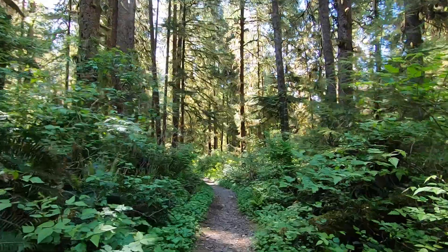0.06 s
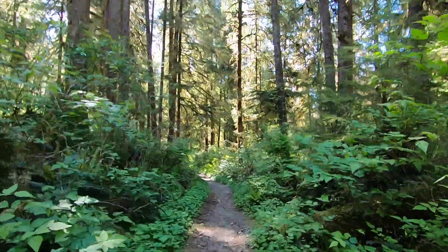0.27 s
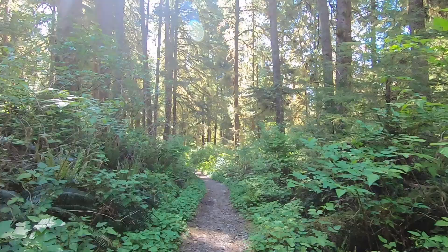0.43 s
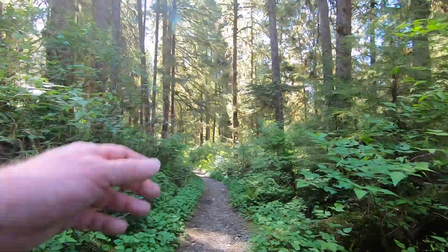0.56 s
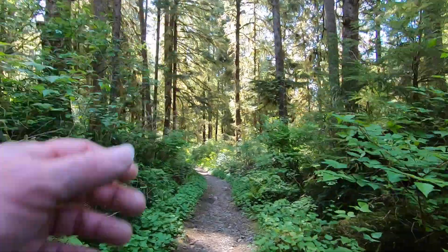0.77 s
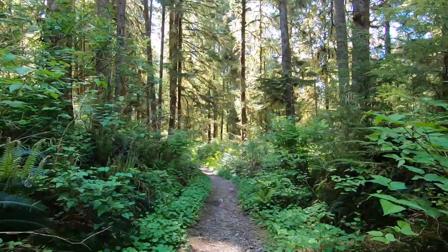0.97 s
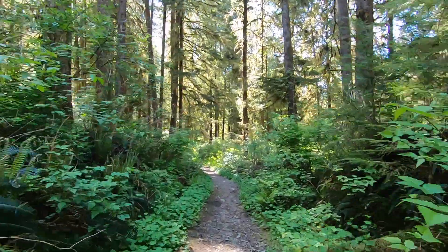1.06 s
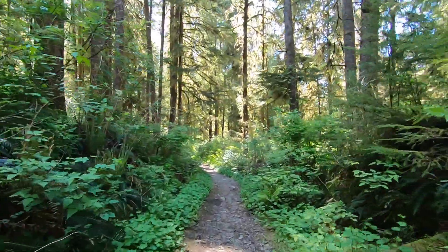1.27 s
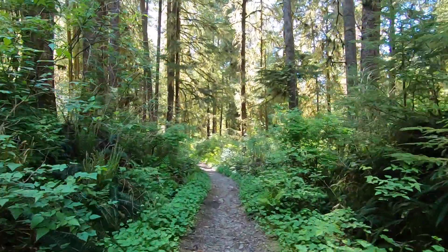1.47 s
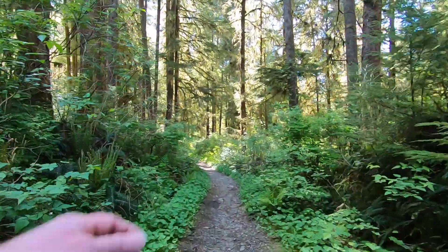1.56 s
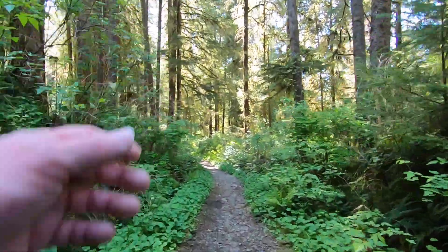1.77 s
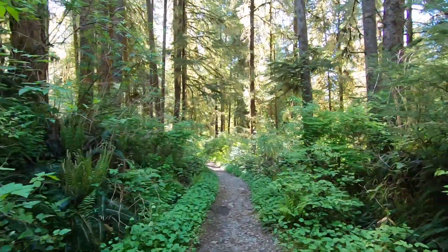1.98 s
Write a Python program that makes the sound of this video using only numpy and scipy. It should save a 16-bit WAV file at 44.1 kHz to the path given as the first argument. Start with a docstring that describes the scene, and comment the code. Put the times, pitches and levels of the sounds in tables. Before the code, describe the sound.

Footsteps on a dirt trail, close and dry, from a small camera carried by the walker. Faint cloth rustle and low shudder open, fairly wide. Steps land near 0.27, 0.77, 1.28 and 1.78 seconds, each a short gritty crunch with a dull thud and snapping stones or twigs. Tiny gear clinks and buzzes follow faintly. Quiet hush fills gaps; the sound narrows nearly to mono, then widens at the end.

```python
"""Four steps on a dirt trail in a quiet forest, heard by a small camera carried on the walker.
The stereo picture starts wide over cloth rustle and a low shudder, then narrows to nearly mono.
Each footfall in turn crunches grit as grains of noise, with damped swings for thuds and snapping stones
and twigs, and low noise for the shudder; a small hard part of the gear clinks and buzzes faintly.
The picture opens again at the end."""
import sys
import numpy as np
from scipy import signal
from scipy.io import wavfile
from scipy.ndimage import uniform_filter1d

SR = 44100
rng = np.random.default_rng(int(sys.argv[2]) if len(sys.argv) > 2 else 0)


def ratio(d):
    """dB to gain"""
    e = np.asarray(d, float) / 20
    return 10 ** e


def bounce(signal):
    """Save signal as a 16-bit WAV file at the path given by the first command-line argument."""
    frames = np.transpose(np.atleast_2d(signal))
    limited = np.clip(frames, -1, 1)
    pcm = np.round(limited * 32767).astype(np.int16)
    wavfile.write(sys.argv[1], SR, pcm)


N = 88729  # samples, about 2 s

# Modes of the small hard part of the gear. Each row: pitch in Hz, level in dB, t60 in seconds.
CLINK_MODES = [(6440, -7.5, 0.011), (7700, -22, 0.0045), (9400, -9, 0.011), (10380, -18.5, .01),
               (13300, -31, 0.005)]


def evened(x):
    """Scales a sound to an rms of 1."""
    return x / np.sqrt(np.mean(x ** 2) + 1e-20)


def read(points, hz):
    """Reads a curve of (Hz, value) points along a logarithmic frequency axis."""
    f, value = np.transpose(points)
    return np.interp(np.log(hz + 1), np.log(f + 1), value)


def along(table, order, off_db=None):
    """Column of a time curve at every sample; off_db holds outside the curve, else its end values."""
    rows = np.array(table)
    return np.interp(np.arange(N) / SR, rows[:, 0], rows[:, order], off_db, off_db)


def add(mix, s, sound):
    """Adds a sound to the mix in place, starting at s seconds and cut off at the end."""
    part = mix[round(s * SR):][:len(sound)]
    part += sound[:len(part)]


def colour(x, tone):
    """Causal minimum-phase filter with the given spectrum; the result has an rms of 1."""
    hz = abs(np.fft.fftfreq(16384, 1 / SR))
    # 18 dB per octave fall from two octaves under the first point
    octaves_below = np.log2(np.maximum(tone[0][0] / (hz + 1), 4) / 4)
    gain_db = np.maximum(read(tone, hz) - 18 * octaves_below, -100)
    log_gain = np.log(ratio(gain_db))
    # the Hilbert transform of the log gain gives the minimum phase
    spectrum = np.exp(log_gain - 1j * signal.hilbert(log_gain).imag)
    taps = np.fft.ifft(spectrum).real[:8192]
    fade = np.hanning(16384)[8192:]
    return evened(signal.oaconvolve(x, taps * fade)[:N])


def grains(per_s, spread_db, bed=.4):
    """Random clicks of random sign, a few of them large, on a bed of noise."""
    size_db = spread_db * np.minimum(rng.exponential(1, N), 5)
    size = ratio(size_db) * rng.choice([-1., 1.], N)
    clicks = size * (rng.random(N) < per_s / SR)
    return evened(clicks) + bed * rng.standard_normal(N)


def ring(db, hz, t60, rise_cycles, wobble):
    """A short damped swing that starts downwards; wobble makes its pitch uneven."""
    t = np.arange(9000) / SR
    uneven = evened(uniform_filter1d(rng.standard_normal(9000), 7))
    rise = 1 - np.exp(-(t * hz / rise_cycles) ** 2)
    shape = rise * ratio(-60 * t / max(t60, .003))
    warped_time = np.cumsum(1 + wobble * uneven) / SR
    return -ratio(db) * shape / shape.max() * np.sin(2 * np.pi * hz * warped_time)


def crunch():
    """Grains of grit crushed under the sole, dull and bright, follow the pressure of each step."""
    # One table per step. Each row: time in seconds, level in dB, upper mids minus level in dB.
    steps = [
        [(0.235, -95, -13), (0.247, -42, -20), (0.253, -41, -7), (0.263, -31.5, -19), (0.281, -26, -15.5),
         (0.305, -43.5, -1.5), (0.323, -36.5, 0), (0.335, -44, -22), (0.357, -43.5, -18), (0.363, -34.5, -9.5),
         (0.382, -41.5, -10), (0.395, -53, -23), (0.439, -45.5, -9), (0.475, -48, -7.5), (0.5, -55, -10)],
        [(0.746, -60, -24), (0.75, -29.5, -13), (0.766, -32.5, -13), (0.771, -50, -7), (0.776, -22.5, -17),
         (0.792, -31.5, -16), (0.81, -47, -6), (0.82, -36, -12), (0.844, -54, -21), (0.856, -41, -18),
         (0.876, -33, -21), (0.896, -63, -3), (1.028, -48, -17), (1.04, -49, -3)],
        [(1.234, -58, -7), (1.241, -28.5, -8), (1.25, -29.5, -22), (1.256, -31, -21), (1.278, -35.5, -7),
         (1.294, -20.5, -23.5), (1.304, -48.5, 1), (1.332, -54, -5), (1.342, -35.5, -9), (1.352, -40.5, -16),
         (1.368, -37, -9.5), (1.384, -46.5, -15), (1.5, -52, -21)],
        [(1.748, -72, -11), (1.754, -72, -23), (1.764, -34.5, -16), (1.782, -18, -22.5), (1.796, -32, -24),
         (1.816, -52, 6.5), (1.824, -28, -14.5), (1.844, -27.5, -19), (1.854, -40.5, -36), (1.958, -54.5, -4),
         (2.0, -55, -30)],
    ]
    # Spectra of the dull and the bright grit. Each row: frequency in Hz, relative density in dB per Hz.
    dull_tone = [(71, -21), (120, 1), (201, -1.5), (476, -3), (668, -6.5), (777, -7), (1160, -11),
                 (1420, -9.5), (2400, -42), (3120, -86), (5280, -120)]
    bright_tone = [(1180, -7), (2000, 3.5), (2410, -2.5), (2920, -1), (4040, -6), (6000, -27.5),
                   (7800, -27.5), (13200, -120)]
    level = sum(ratio(along(step, order=1, off_db=-120)) for step in steps)
    upper = sum(ratio(along(step, order=1, off_db=-120) + along(step, order=2)) for step in steps)
    dull = colour(grains(per_s=1200, spread_db=2.2), dull_tone)
    bright = colour(grains(per_s=1100, spread_db=2.4), bright_tone)
    return level * dull + upper * bright


def snaps():
    """Single stones and twigs snapping: short damped swings of uneven pitch."""
    # The dull ones first, then the bright ticks.
    # Each row: start in seconds, envelope peak in dB, pitch in Hz, t60 in seconds (3 ms at least).
    snap_rows = [(0.246, -38, 770, 0.011), (0.264, -21, 644, 0.0071), (0.259, -37, 630, 0.0081),
                 (0.271, -19, 1090, 0.0068), (0.276, -21.5, 1114, 0.013), (0.294, -28.5, 1200, 0.014),
                 (0.318, -32.5, 2000, 0.007), (0.3197, -23, 1448, 0.029), (0.749, -25, 1300, 0.011),
                 (0.764, -19.5, 624, 0.009), (0.7741, -19, 1100, 0.0054), (0.766, -29, 1380, 0.0076),
                 (0.777, -25.5, 1470, 0.011), (0.7775, -23.5, 680, 0.03), (0.764, -27, 410, 0.032),
                 (0.78, -24.5, 1250, 0.011), (0.788, -28, 620, 0.015), (0.985, -40, 1270, 0.014),
                 (1.1811, -31.5, 1770, 0.0047), (1.241, -19, 910, 0.0055), (1.2469, -20, 576, 0.015),
                 (1.269, -24, 680, 0.016), (1.274, -27, 930, 0.044), (1.289, -10.5, 1123, 0.0093),
                 (1.3155, -28, 1150, 0.0083), (1.3654, -25.5, 1500, 0.0089), (1.7105, -28.5, 1320, 0.0056),
                 (1.725, -38, 1350, 0.017), (1.754, -25.5, 650, 0.0056), (1.773, -27, 710, 0.0081),
                 (1.782, -16, 1293, 0.029), (1.7805, -24.5, 544, 0.036), (1.8231, -24, 1214, 0.01),
                 (1.839, -22.5, 1565, 0.019), (0.815, -35, 1880, 0.018), (0.883, -34, 1450, 0.012),
                 (1.308, -31, 1290, 0.011), (1.797, -23.5, 1390, 0.0078), (1.827, -28.5, 1700, 0.015),
                 (1.753, -38, 1500, 0.0087), (0.2754, -39, 3180, 0.033), (0.3077, -45, 3400, 0.012),
                 (0.3133, -40, 4370, 0.011), (0.3212, -38, 2950, 0.0089), (0.7103, -37, 2640, 0.004),
                 (0.712, -42.5, 3380, 0.018), (0.7493, -50, 2730, 0.01), (0.7534, -38, 3680, 0.018),
                 (0.766, -40, 2800, 0.01), (0.777, -33.5, 2570, 0.015), (0.7876, -46, 3200, 0.0082),
                 (0.872, -39.5, 2300, 0.016), (1.2416, -26, 3100, 0.0058), (1.2479, -31.5, 3470, 0.008),
                 (1.26, -37, 2260, 0.0067), (1.27, -36, 2880, 0.0086), (1.716, -37.5, 2220, 0.0023),
                 (1.877, -33, 1480, 0.015), (1.7665, -30, 4020, 0.01), (1.767, -40, 2480, 0.0054),
                 (1.774, -32, 3400, 0.012), (1.779, -32.5, 2820, 0.013), (1.782, -36, 2970, 0.011),
                 (1.816, -38, 3830, 0.012), (1.8256, -39, 3880, 0.01), (1.838, -29.5, 2780, 0.0096)]
    out = np.zeros(N)
    for s, db, hz, t60 in snap_rows:
        add(out, s, ring(db, hz, t60, rise_cycles=1.1, wobble=.13))
    return out


def thuds():
    """Thuds of heel and sole reaching the camera: damped swings of steady pitch."""
    # Each row: start in seconds, envelope peak in dB, pitch in Hz, t60 in seconds.
    thud_rows = [(0.279, -8, 200, 0.011), (0.324, -21, 185, 0.0091), (0.453, -37.5, 163, 0.054),
                 (0.754, -28, 162, 0.15), (0.803, -33, 81.4, 0.079), (.819, -26, 150, 0.0097),
                 (0.831, -33.5, 26.4, 0.22), (0.916, -29, 30, 0.066), (1.244, -31, 252, 0.023),
                 (1.292, -8.5, 185, 0.016), (1.299, -23, 62.3, 0.044), (1.2931, -17.5, 337, 0.025),
                 (1.307, -33, 200, 0.018), (1.343, -24, 213, 0.014), (1.756, -23.5, 164, 0.0094),
                 (1.777, -20, 296, 0.037), (1.786, -28.5, 108, 0.22), (1.827, -12.5, 98.6, 0.025),
                 (1.828, -24.5, 61, 0.11)]
    out = np.zeros(N)
    for s, db, hz, t60 in thud_rows:
        add(out, s, ring(db, hz, t60, rise_cycles=.55, wobble=0))
    return out


def shudder():
    """Low shudder of the camera on the body: noise in two bands; each footfall starts a new swell."""
    # One table per swell, the first from the very start.
    # Each row: time in seconds, level in dB, deepest part minus level in dB.
    swells = [
        [(0.0, -42, -1), (0.042, -66, -18), (0.062, -88, 8), (0.084, -66, -8), (0.118, -61, -12),
         (0.14, -69, -13), (0.168, -87, 17), (0.198, -73, -7), (0.215, -70, -11)],
        [(0.245, -42, -9), (0.277, -53, -13), (0.351, -37, -1), (0.395, -37.5, -2), (0.479, -61.5, 16),
         (0.495, -79, -9), (0.525, -89, 14), (0.669, -94, 0), (0.715, -72, -4)],
        [(0.747, -42, -25), (0.819, -36.5, -22), (0.853, -56, 9), (0.949, -48, -3), (0.999, -70, -2.5),
         (1.031, -74, -3), (1.083, -86, 13), (1.109, -69, 0), (1.205, -70, -9)],
        [(1.237, -36, -23), (1.305, -41, -18), (1.317, -47, -8), (1.333, -46, 8), (1.451, -70, 7),
         (1.489, -55, 4), (1.519, -64, 8), (1.609, -83, -11), (1.72, -72, -15)],
        [(1.752, -45, -19), (1.794, -37, -29), (1.838, -31, -24), (1.92, -63, 17), (1.968, -46, -8),
         (2.01, -95, 11)],
    ]
    # Spectra of the low and the deepest band. Each row: frequency in Hz, relative density in dB per Hz.
    low_tone = [(30, 4), (50, 12), (75, 13), (105, 8.5), (150, -69.5)]
    deep_tone = [(8, -17), (20, 35.5), (40, 5), (60, -40.5)]
    starts = [rows[0][0] for rows in swells[1:]]
    step = np.searchsorted(starts, np.arange(N) / SR)
    low_db = np.choose(step, [along(rows, order=1) for rows in swells])
    deep_db = np.choose(step, [along(rows, order=2) for rows in swells])
    low_level = uniform_filter1d(ratio(low_db), size=200)
    # this average looks back only, so the deepest part lags
    deep_level = uniform_filter1d(ratio(low_db + deep_db), size=600, origin=299)
    low = low_level * colour(rng.standard_normal(N), low_tone)
    deep = deep_level * colour(rng.standard_normal(N), deep_tone)
    return low + deep


def patchy():
    """Level that wavers within some 20 ms, as cloth folds rub and let go."""
    drift = uniform_filter1d(uniform_filter1d(rng.standard_normal(N), size=600), size=600)
    return ratio(1.5 * evened(drift))  # 1.5 dB rms


def rustle():
    """Clothing rustle over still air: a smooth low hush, with grainy, wavering mids and treble."""
    # Each row: time in seconds, then levels in dB of low hush, lower mids, upper mids and treble,
    # the last three ahead of the wavering.
    levels = [(0.0, -55.5, -55.5, -65, -66), (0.05, -59, -61.5, -67, -69.5),
              (0.11, -56.5, -58.5, -59, -62.5), (0.19, -52.5, -55, -62, -61), (0.23, -54, -58, -60, -72),
              (0.28, -52, -49, -90, -61), (0.33, -42, -44.5, -52, -56.5), (0.38, -52, -52, -58, -66),
              (0.4, -49, -51, -52.5, -54), (0.44, -54, -58, -64, -63.5), (0.69, -50, -56, -62.5, -66),
              (0.78, -47, -50.5, -57, -61), (0.79, -65, -46, -43, -48), (0.8, -39, -44, -57, -61),
              (0.88, -44.5, -46, -54, -67.5), (1.07, -50, -56, -62.5, -69.5),
              (1.26, -48.5, -47.5, -53, -56), (1.35, -43.5, -45, -57, -62.5),
              (1.41, -52, -50.5, -58.5, -69.5), (1.56, -50, -57.5, -59.5, -72),
              (1.67, -49.5, -55, -63, -67), (1.76, -47.5, -51.5, -57, -70.5), (1.78, -33, -39, -49, -52.5),
              (1.8, -48, -33.5, -53, -63), (1.84, -39, -60, -48, -55.5), (1.86, -52, -43.5, -57.5, -64),
              (1.92, -47, -52, -59.5, -70.5), (2.01, -55, -54, -59, -67)]
    # Spectra of the four bands. Each row: frequency in Hz, relative density in dB per Hz.
    hush_tone = [(65, -22.5), (113, -20), (135, -10), (156, 0), (210, 1), (249, -5.5), (330, -5),
                 (479, -10), (650, -16), (840, -114), (1430, -120)]
    mid_tone = [(320, -29), (550, 2.5), (1360, 1), (1650, 0.5), (1810, 1.5), (2300, -9.5), (2990, -26),
                (5060, -120)]
    upper_tone = [(1240, -28), (2100, 2), (2310, 2), (3450, -3.5), (3840, -5), (4950, -13), (5600, -57),
                  (7280, -47), (12300, -120)]
    treble_tone = [(3060, -2.5), (5200, 0), (5390, -2.5), (6090, -10.5), (6670, -3.5), (8660, -7.5),
                   (9610, -8), (10300, -9.5), (11000, -17), (11600, -25), (13700, -24), (15300, -34)]
    hush = ratio(along(levels, order=1)) * colour(rng.standard_normal(N), hush_tone)
    mids = ratio(along(levels, order=2)) * colour(grains(800, 3.6, bed=1.0), mid_tone)
    upper = ratio(along(levels, order=3)) * colour(grains(1000, 2.7, bed=1.6), upper_tone)
    treble = ratio(along(levels, order=4)) * colour(grains(700, 2.5, bed=1.86), treble_tone)
    return hush + patchy() * mids + patchy() * upper + patchy() * treble


def clinks():
    """A small hard part of the gear clinking: each clink rings all its modes, unevenly loud."""
    # Each row: start in seconds, level in dB ahead of the mode's own level and a random spread.
    clink_rows = [(0.2767, -45), (0.2927, -45.5), (0.32, -43), (0.337, -47), (0.372, -54), (0.395, -52),
                  (0.399, -44.5), (0.408, -53), (0.6406, -53.5), (0.7527, -53), (0.7867, -41),
                  (0.8034, -55), (1.1867, -52), (1.2496, -39.5), (1.294, -46), (1.777, -49), (1.838, -46)]
    spread_db = 5
    out = np.zeros(N)
    for s, db in clink_rows:
        for hz, mode_db, t60 in CLINK_MODES:
            peak_db = db + mode_db + spread_db * rng.standard_normal()
            add(out, s, ring(peak_db, hz, t60, rise_cycles=3.4, wobble=0.088))
    return out


def buzz():
    """The same part buzzing faintly as the cloth moves: grainy noise through two of its resonances."""
    # Each row: time in seconds, level in dB ahead of the level of each band.
    levels = [(0.0, -77), (0.25, -82), (0.33, -62), (0.385, -76), (0.396, -59), (0.42, -59.5), (0.435, -74),
              (0.56, -89), (0.81, -68), (1.05, -80.5), (1.28, -63.5), (1.4, -78.5), (1.73, -81),
              (1.84, -69), (1.89, -87), (2.01, -93)]
    # Level of each of the two bands in dB, lower band first.
    band_levels = [-3, -5]
    width_hz = 380
    r = np.exp(-np.pi * width_hz / SR)  # pole radius
    bands = np.zeros(N)
    for db, mode in zip(band_levels, CLINK_MODES[0:3:2]):  # first and third mode
        poles = [1, -2 * r * np.cos(2 * np.pi * mode[0] / SR), r * r]
        bands += ratio(db) * evened(signal.lfilter([1], poles, grains(600, 3.1, bed=0.58)))
    return ratio(along(levels, order=1)) * bands


def stereo(mid):
    """Everything reaches both microphone ports alike; a phase-scrambled share differs between them."""
    # Stereo width. Each row: time in seconds, width in dB below the split, width in dB above it.
    openness = [(0, 10.5, 0), (.33, -4, -9), (.45, -12, -16), (.7, -24, -20), (.75, -25, -26),
                (.8, -25, -10), (.86, -24, -21), (1.0, -31, -18), (1.2, -34, -29), (1.25, -28, -17),
                (1.3, -38, -41), (1.5, -26, -15), (1.68, -25, -22), (1.77, -11, -13), (2.01, -2, -7)]
    # Scrambled share at 0 dB width. Each row: frequency in Hz, side minus mid in dB ahead of a doubling.
    apart_curve = [(60, -11), (100, -11), (130, -18), (220, -16.5), (310, -30), (550, -18), (950, -11.5),
                   (1650, -8.5), (2860, -15), (4970, -1.5), (8640, 3.5), (15000, -21)]
    # Lean to the right at 0 dB width. Each row: frequency in Hz, share of the mid.
    lean_curve = [(300, 0), (700, 0.0051), (1400, 0.29), (2800, 0.083), (5000, 0)]
    split_hz, top_hz, top_apart_db = 3200, 11000, -5
    hz, t, z = signal.stft(mid, SR, nperseg=256, noverlap=192)
    s, low_db, high_db = np.transpose(openness)
    width_db = np.where(hz[:, None] < split_hz, np.interp(t, s, low_db), np.interp(t, s, high_db))
    width = ratio(width_db)
    # above top_hz the share stays the same throughout
    apart = np.where(hz[:, None] > top_hz, ratio(top_apart_db), ratio(read(apart_curve, hz))[:, None] * width)
    turn = np.exp(2j * np.pi * rng.random(z.shape[::-1]).T)
    lean = read(lean_curve, hz)[:, None] * width
    side = signal.istft(z * (2 * turn * apart - lean), SR, nperseg=256, noverlap=192)[1][:N]
    return np.array([mid + side, mid - side])


def scene():
    """Sums footfalls, shudder, rustle and gear, then spreads them over the two ports."""
    footfalls = crunch() + snaps() + thuds()
    return stereo(footfalls + shudder() + rustle() + clinks() + buzz())


def roll_off(x):
    """The treble ends steeply here."""
    return signal.sosfilt(signal.butter(12, 15610, fs=SR, output="sos"), x)


def record(dry):
    """Soft band limit at the top of the treble."""
    edge = signal.firwin(numtaps=81, cutoff=15050, fs=SR)  # cutoff in Hz
    limited = signal.oaconvolve(dry, edge[None], "same")
    return roll_off(limited)


dry = scene()
out = record(dry)
bounce(out)
```